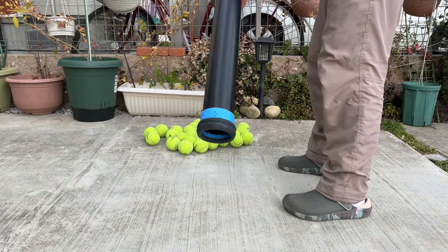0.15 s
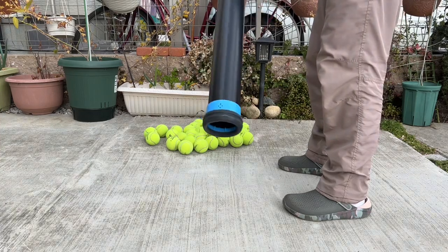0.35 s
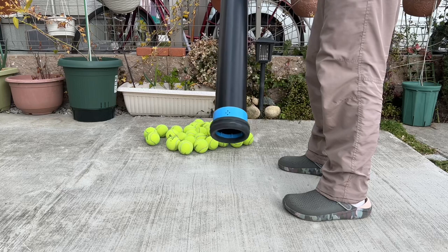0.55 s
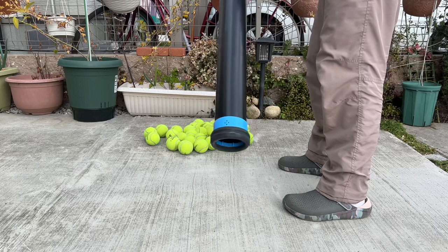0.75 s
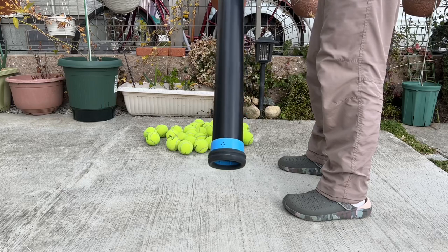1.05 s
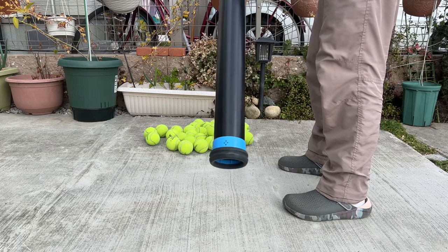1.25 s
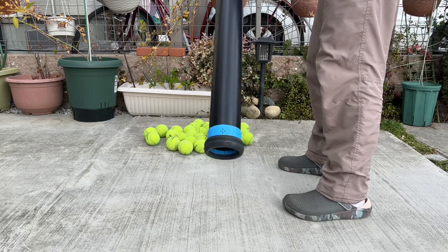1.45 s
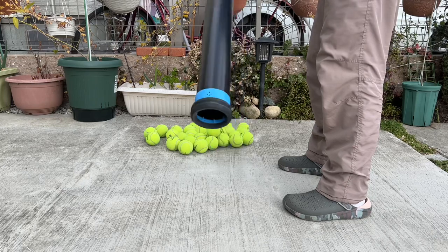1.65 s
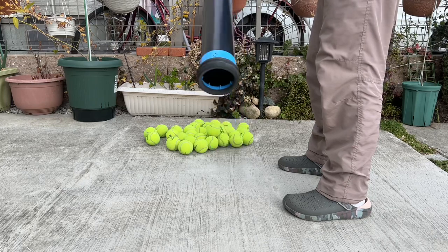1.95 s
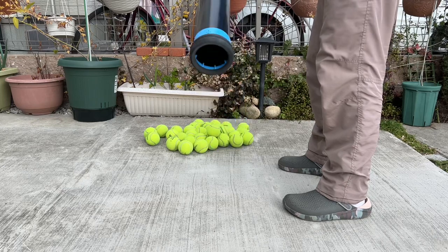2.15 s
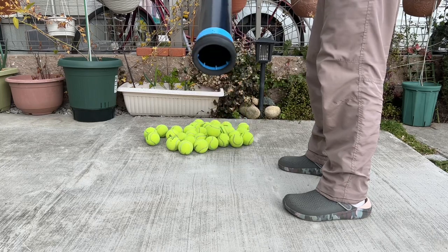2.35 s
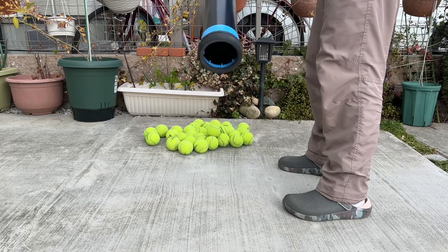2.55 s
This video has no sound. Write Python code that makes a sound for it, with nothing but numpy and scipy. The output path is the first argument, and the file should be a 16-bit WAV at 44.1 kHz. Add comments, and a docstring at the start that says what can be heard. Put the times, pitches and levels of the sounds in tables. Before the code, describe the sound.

Two hollow clacks of a tennis ball sliding into a plastic tube, with dull handling bumps.

```python
"""A patio in a walled yard, a stereo pair of microphones close to a plastic ball-collecting tube.
Twice a tennis ball scrapes along the tube, felt on plastic, and knocks home: the wall clacks and the
air column rings hollow. In between the tube bumps dully as it is swung and lifted, and cloth rustles.
The yard walls answer the ball, near ones first, over a quiet outdoor background."""
import sys
import numpy as np
from scipy import signal
from scipy.fft import rfft, irfft, next_fast_len
from scipy.io import wavfile
from scipy.ndimage import map_coordinates

SR = 44100
rng = np.random.default_rng(int(sys.argv[2]) if len(sys.argv) > 2 else 0)


def put_to_file(sound):
    """Save the sound as 16-bit audio at rate SR, in the file named by the first command-line argument."""
    columns = np.atleast_2d(sound).T  # one column per channel
    safe = np.clip(columns, -1, 1)
    whole_steps = np.round(safe * 32767)
    wavfile.write(sys.argv[1], SR, whole_steps.astype(np.int16))


N = 119070

# How alike the two microphones hear diffuse and close sound. Each row: frequency in Hz, likeness.
DIFFUSE_LIKENESS = [(60, 0.2), (130, 0.6), (290, 0.81), (640, -0.38), (1400, -.45), (3100, .15),
                    (12000, -1.2)]
CLOSE_LIKENESS = [(100, 1), (1400, 0.95), (3100, 0.96), (7000, 1), (15000, 0.083)]
# The colour of each noise. Each row: frequency in Hz, relative spectral level in dB.
OUTDOOR_SPECTRUM = [(20, -35.5), (40, -13), (65, -6), (110, -7), (180, -14.5), (330, -12), (520, -14),
                    (1000, -16.5), (1800, -29.5), (3300, -44.5), (7000, -55), (15000, -62.5)]
RUMBLE_SPECTRUM = [(24, -40.5), (40, -1.5), (60, 1.5), (100, 1), (180, -8.5), (300, -19), (600, -60.5)]
CLOTH_SPECTRUM = [(500, -5.5), (2000, -3), (4000, -5), (5900, -5.5), (6700, 2.5), (7500, -1), (8600, -6),
                  (12800, -4), (15500, -7.5)]
FELT_BODY_SPECTRUM = [(60, -23), (150, 2), (280, -10.5), (500, -7), (700, -1), (900, -4), (995, 5),
                      (1080, -3.5), (1650, -1), (2500, -9.5), (3200, -9), (4000, -22), (9000, -44.5)]
FELT_HISS_SPECTRUM = [(1000, -25.5), (3000, -2.5), (4500, -1), (7000, -0.5), (8800, -2.5), (12500, -3),
                      (15500, -19.5)]
PLASTIC_SPECTRUM = [(100, -25.5), (300, -21), (700, -8.5), (980, -6.5), (1400, 4.5), (2400, -7.5),
                    (3300, -9.5), (4000, -14.5), (8000, -13.5), (15000, -17)]
YARD_SPECTRUM = [(100, 1.5), (400, -9), (650, 5.5), (900, -0.5), (1400, 2.5), (2100, -6.5), (3200, -1),
                 (4800, 3.5), (7000, -4), (14000, -10)]
# Decay of the tube wall and of the yard. Each row: frequency in Hz, seconds to fall 60 dB.
PLASTIC_T60 = [(200, 0.6), (1000, .13), (3000, 0.3), (12000, 0.055)]
YARD_REVERB_T60 = [(150, 0.4), (700, 0.4), (2000, 0.69), (5000, 0.25), (7500, 0.71), (12000, 0.33)]
# Rumble of the moving tube. Each row: time in seconds, level in dB.
RUMBLE_LEVELS = [(0, -54.5), (.35, -59), (0.471, -47.5), (.55, -51.5), (.68, -46), (.78, -58.5),
                 (.92, -52.5), (1.2, -63.5), (1.5, -68), (1.7, -53.5), (1.98, -56), (2.058, -44),
                 (2.28, -43.5), (2.35, -47), (2.448, -42.5), (2.599, -58)]
# Cloth near the microphones. Each row: peak time in seconds, level in dB, rise and fall in seconds.
CLOTH_SWELLS = [(.012, -63, .03, .035), (0.329, -67, 0.016, .03), (.67, -79, 0.033, 0.03),
                (.785, -67, 0.029, 0.0394), (0.858, -64, 0.062, 0.082), (1.527, -68, 0.028, .06),
                (1.764, -71, 0.079, 0.044), (2.196, -71.5, 0.026, .035), (2.53, -91, .03, 0.05),
                (2.64, -83, .05, .1)]
# Felt scraping, one curve per slide. Each row: time in seconds, body level in dB, hiss level in dB.
SLIDE_CURVES = [
    [(.08, -71.5, -79.5), (.102, -50, -60), (.13, -42.5, -54), (.17, -45.5, -56), (.195, -44, -49),
     (.218, -36.5, -32), (.236, -37, -39.5), (.27, -52.5, -57.5), (.3, -87.5, -81)],
    [(2.366, -84, -86), (2.381, -45.5, -52.5), (2.395, -40.5, -49.5), (2.412, -45, -53.5),
     (2.427, -33, -39), (2.44, -50, -55.5), (2.49, -84, -81.5)],
]
# The tube's air column. Each row: frequency in Hz, relative level in dB, base T60 in seconds.
AIR_MODES = [(135.1, -1, 0.51), (236.7, -12, 0.815), (377, 1, 0.37), (481.6, -2, 0.3), (637.6, 8, 0.12),
             (737, 3.5, .17), (904, -15, 0.3), (973, -24.5, 0.6), (1131, -7, .15), (1199, -1, 0.14),
             (1356.4, -7, .16), (1481.5, -12, 0.081), (1610, -8.5, .12), (1772, -8.5, 0.18),
             (1920, -14.5, .15), (2150, -14.5, 0.15), (2284, -8, 0.17), (2405, -12.5, 0.15),
             (2813, -20.5, .2), (3270, -16.5, .19)]
# Small ticks of the plastic. Each row: start in seconds, level in dB.
PLASTIC_TICKS = [(.107, -46.5), (0.772, -55.5), (1.502, -63.5), (2.18, -58.5), (2.207, -63.5)]
# The ball hits the wall and other balls. Each row: peak time in seconds, level in dB, pitch in Hz,
# half-width in cycles.
BALL_CONTACTS = [(0.2336, -2, 1866, 0.61), (.2342, -13, 3232, 0.63), (0.2357, -11, 2896, 1.04),
                 (0.2382, -16.5, 1477, 1.9), (0.2445, -14, 1303, 1.1), (0.2448, -18, 2200, 1.5),
                 (0.2479, -16, 2397, 1), (.2519, -9.5, 739.6, 2.4), (.2588, -12, 720, 2),
                 (0.2623, -20.5, 2812, 0.86), (2.4278, -27.5, 807, 1), (2.433, -16, 733, 0.47),
                 (2.4359, -24.5, 778, 1.9), (2.4342, -28.5, 1210, 4.6)]
# The ball stops. Each row: start in seconds, air column and wall levels in dB, low and high corners
# in Hz, right over left in dB, damping factor.
BALL_STOPS = [(.2375, -20, -25.5, 90.7, 3800, 2.5, 1.096), (2.4315, -26, -40.5, 451, 555, -0.5, 1.26)]
# The tube is swung and lifted. Each row: start in seconds, peak level in dB, pitch in Hz.
TUBE_BUMPS = [(0.427, -44, 56.6), (0.57, -38.5, 72), (0.636, -40, 90.3), (0.663, -30, 66.7),
              (0.879, -40.5, 78.5), (2.03, -27, 78.6), (2.05, -28, 57.2), (2.089, -35.5, 177),
              (2.097, -19.5, 76.4), (2.15, -23, 55.8), (2.182, -38.5, 189), (2.188, -30, 55.2),
              (2.242, -27, 69.4), (2.253, -26, 125), (2.279, -28, 73), (2.32, -36.5, 59),
              (2.357, -33, 82.1), (2.38, -39.5, 197), (2.393, -37, 67.5), (2.437, -36, 190),
              (2.531, -52, 85)]
# The microphones' treble notch. Each row: frequency in Hz, gain in dB.
MIC_RESPONSE = [(8800, 0), (9500, -27), (10500, -27), (11200, 2)]


def amp(db):
    """Decibels to gain."""
    return 10 ** (np.asarray(db) / 20)


def unit(x):
    """Scale to rms 1."""
    return x / np.sqrt(np.mean(x ** 2) + 1e-20)


def along(points, hz):
    """Read (Hz, value) points on a log frequency axis."""
    freqs, values = np.transpose(points)
    return np.interp(np.log(hz + 1), np.log(freqs + 1), values)


def since(start):
    """Seconds since start, zero before."""
    return np.maximum(np.arange(N) / SR - start, 0)


def wobble(rate):
    """A smooth random curve, rate knots a second."""
    return map_coordinates(rng.standard_normal(N // 8), [np.arange(N) * rate / SR], mode="wrap")


def filtered(x, response):
    """Filter x by a function of frequency in Hz."""
    size = next_fast_len(N + SR // 2)
    return irfft(rfft(x, size) * response(np.fft.rfftfreq(size, 1 / SR)), size)[..., :N]


def delayed(x, seconds):
    """Start a stereo sound later."""
    return np.pad(x, ((0, 0), (round(seconds * SR), 0)))[:, :N]


def panned(right_db):
    """Gains at the left and right microphones."""
    return amp(np.array([[-right_db], [right_db]]) / 2)


def noise(spectrum, likeness):
    """Coloured stereo noise of rms 1; likeness 1 is mono, -1 opposite in phase."""
    def response(hz):
        angle = np.arccos(np.clip(along(likeness, hz), -1, 1)) / 2
        return amp(along(spectrum, hz)) * [np.cos(angle), np.sin(angle)]
    mid, side = filtered(rng.standard_normal((2, N)), response)
    return unit(np.array([mid + side, mid - side]))


def dying(x, t60, rise_s):
    """x swells quickly, then each frequency dies at its own speed."""
    hz, t, frames = signal.stft(x, SR, nperseg=256)
    decay = amp(-60 * t / along(t60, hz)[:, None])
    return signal.istft(frames * decay, SR)[1][:, :N] * (1 - np.exp(-since(0) / rise_s))


def outdoor_air(level_db=-57.5):
    """The quiet, steady background all around the patio."""
    return amp(level_db - 0.03 * wobble(6)) * noise(OUTDOOR_SPECTRUM, DIFFUSE_LIKENESS)


def handling_rumble():
    """A low flutter rises and falls as the tube is moved."""
    level_db = np.interp(since(0), *np.transpose(RUMBLE_LEVELS))
    return amp(level_db) * noise(RUMBLE_SPECTRUM, DIFFUSE_LIKENESS)


def cloth_rustles(grain_db=2, grain_hz=250):
    """Cloth brushes close by in short grainy swells."""
    t, swells = since(0), np.zeros(N)
    for peak, db, rise, fall in CLOTH_SWELLS:
        width = np.where(t < peak, rise, fall)
        swells += amp(db) * np.exp(-(abs(t - peak) / width) ** 1.4)
    grain = unit(amp(grain_db * wobble(grain_hz)))
    return swells * grain * noise(CLOTH_SPECTRUM, CLOSE_LIKENESS)


def air_column(t, low_hz, high_hz, damping):
    """The air in the tube rings, driven between two corner frequencies; low modes swell more slowly."""
    ring = np.zeros(N)
    for hz, db, t60 in AIR_MODES:
        drive = amp(db) / np.sqrt((1 + (low_hz / hz) ** 18) * (1 + (hz / high_hz) ** 4))
        rise_s = 0.0013 + 2.8 / hz
        swell = 1 - np.exp(-(t / rise_s) ** 2)
        ring += drive * swell * amp(-60 * damping * t / t60) * np.sin(2 * np.pi * hz * t)
    return ring


def felt_slides(grain_db=0.5, grain_hz=700, hum_db=-5.5):
    """Grainy friction of felt on plastic swells up to each knock and hums in the air column."""
    out, t = np.zeros((2, N)), since(0)
    for curve, (_, _, _, low_hz, high_hz, _, damping) in zip(SLIDE_CURVES, BALL_STOPS):
        times, body_db, hiss_db = np.transpose(curve)
        level = lambda db: amp(np.interp(t, times, db, left=-120, right=-120))
        grain = unit(amp(grain_db * wobble(grain_hz)))
        rub = noise(FELT_BODY_SPECTRUM, CLOSE_LIKENESS)
        ring = air_column(t, low_hz, high_hz, damping)
        hum = unit(signal.fftconvolve(rub, ring[None], axes=1)[:, :N])
        hiss = noise(FELT_HISS_SPECTRUM, CLOSE_LIKENESS)
        out += grain * (level(body_db) * (rub + amp(hum_db) * hum) + level(hiss_db) * hiss)
    return out


def plastic_ticks(t60=0.01904):
    """The plastic ticks faintly now and then, each a fast-dying burst of noise."""
    bursts = sum(amp(db - 60 * since(start) / t60) * (since(start) > 0) for start, db in PLASTIC_TICKS)
    return bursts * noise(PLASTIC_SPECTRUM, CLOSE_LIKENESS)


def ball_clacks():
    """Each contact is a short clack of a few cycles, with its own pitch and loudness."""
    out = np.zeros(N)
    for peak, db, hz, half_width in BALL_CONTACTS:
        cycles = (since(0) - peak) * hz
        out += amp(db) * np.exp(-(cycles / half_width) ** 2) * np.cos(2 * np.pi * cycles)
    return out


def ball_knocks():
    """The stopping ball rings the air column and the dense, short modes of the plastic wall."""
    out = np.zeros((2, N))
    for start, air_db, wall_db, low_hz, high_hz, right_db, damping in BALL_STOPS:
        wall = dying(noise(PLASTIC_SPECTRUM, CLOSE_LIKENESS), PLASTIC_T60, rise_s=0.0013)
        ring = air_column(since(start), low_hz, high_hz, damping)
        out += panned(right_db) * (amp(wall_db) * delayed(wall, start) + amp(air_db) * ring)
    return out


def yard_reverb(x, echo_s=0.2, echo_db=-11.5, echo_top_hz=5000):
    """Near walls and paving answer diffusely, then a farther wall, duller and softer."""
    wash = lambda rise_s: dying(noise(YARD_SPECTRUM, DIFFUSE_LIKENESS), YARD_REVERB_T60, rise_s)
    far = filtered(wash(rise_s=0.036), lambda hz: 1 / (1 + (hz / echo_top_hz) ** 6))
    tail = wash(rise_s=0.0021) + amp(echo_db) * delayed(far, echo_s)
    tail /= np.linalg.norm(tail[0])
    return signal.fftconvolve(x.mean(axis=0)[None], tail, axes=1)[:, :N]


def tube_bumps(rise_cycles=0.85):
    """The handled tube gives soft low thuds that swell and die within a few cycles."""
    out = np.zeros(N)
    for start, db, hz in TUBE_BUMPS:
        cycles = since(start) * hz
        age = cycles / rise_cycles
        out -= amp(db) * (age * np.exp(1 - age)) ** 2 * np.sin(2 * np.pi * cycles)
    return out


def scene(right_lag_s=0.00004, yard_db=-20.5, mic_hiss_db=-90):
    """The tube close to the microphones, the open yard around them."""
    ball = ball_clacks() * panned(right_db=3) + ball_knocks() + felt_slides()
    # The ball's sound reaches the left microphone just ahead of the right.
    direct = filtered(ball, lambda hz: np.exp(1j * np.pi * hz * right_lag_s * np.array([[1], [-1]])))
    background = outdoor_air() + amp(mic_hiss_db) * rng.standard_normal((2, N))
    reverb = amp(yard_db) * yard_reverb(ball)
    handling = tube_bumps() + handling_rumble() + cloth_rustles() + plastic_ticks()
    return direct + reverb + handling + background


def record(dry, top_hz=15800):
    """The microphones have a notch in the treble and a steep band limit."""
    return filtered(dry, lambda hz: amp(along(MIC_RESPONSE, hz)) * (hz < top_hz))


dry = scene()
out = record(dry)
put_to_file(out)
```